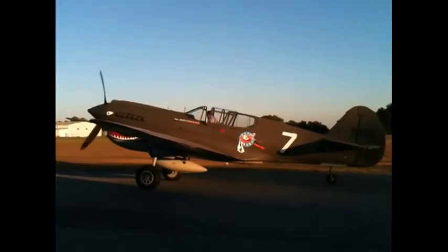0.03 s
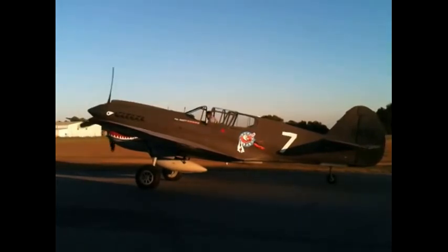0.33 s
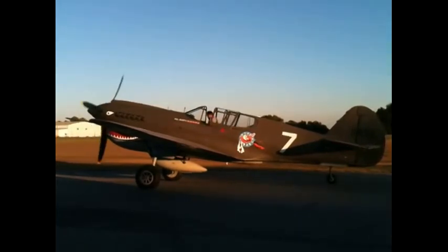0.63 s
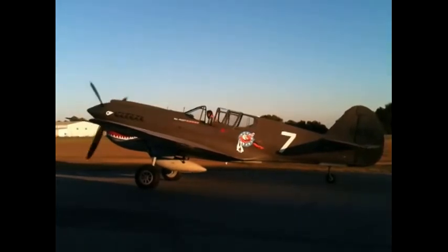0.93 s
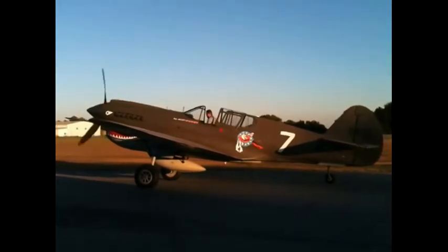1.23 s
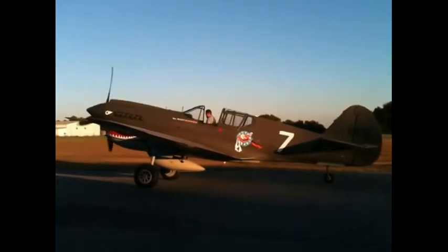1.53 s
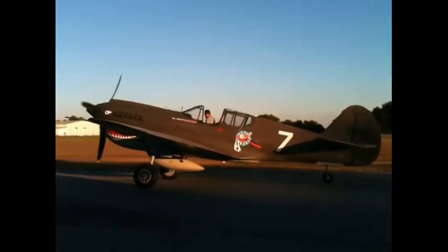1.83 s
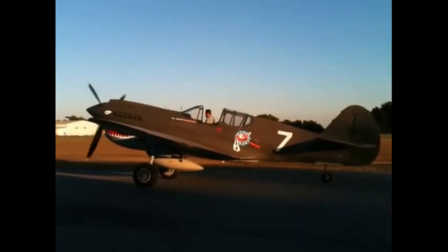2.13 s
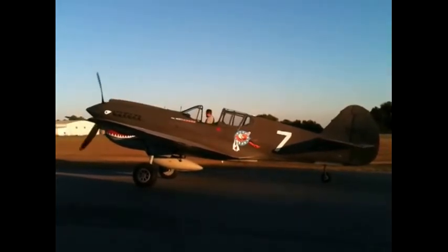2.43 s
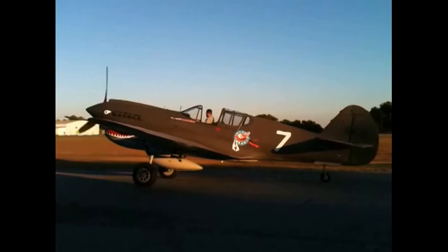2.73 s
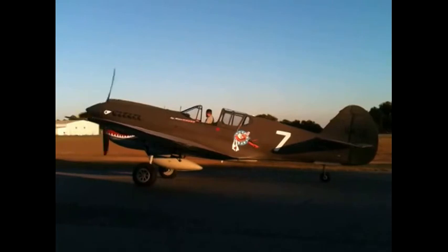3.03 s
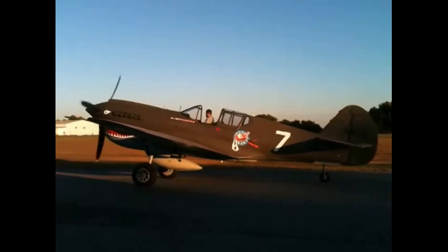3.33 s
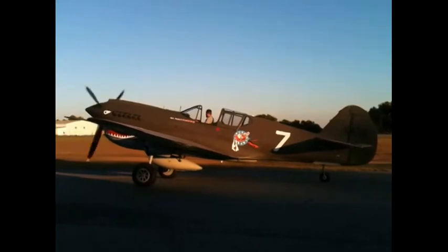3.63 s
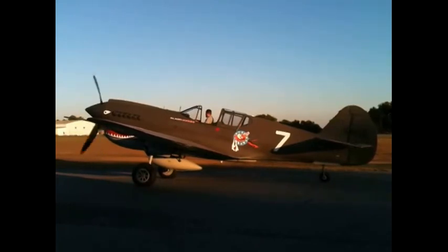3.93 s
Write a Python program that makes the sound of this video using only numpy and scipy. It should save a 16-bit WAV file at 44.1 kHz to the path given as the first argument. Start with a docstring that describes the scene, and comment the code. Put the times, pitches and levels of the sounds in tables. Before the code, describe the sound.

A piston aircraft engine idles steadily with rapid, spitting exhaust bursts over a low rumble.

```python
"""A twelve-cylinder piston aircraft engine idles near 830 rpm on an open apron, heard from the side.
From the start, each near-bank firing spits a sharp, whistling gas burst from its stub exhaust, with a
low thump; the far bank follows with a duller beat. Rumble and hiss fill the gaps, and the loudest
bursts overload the microphone. Weak firings come now and then. At 1.6 s a cylinder misfires and the
hiss dips briefly; it dips again near 2.5 s and 3.9 s."""
import sys
import numpy as np
from scipy import signal
from scipy.fft import rfft, irfft
from scipy.io import wavfile
from scipy.ndimage import uniform_filter1d

SR = 44100
rng = np.random.default_rng(int(sys.argv[2]) if len(sys.argv) > 2 else 0)


def wav_out(sig):
    """Save sig, one row per channel (or a flat mono array), as 16-bit PCM at SR to the path in sys.argv[1]."""
    wavfile.write(sys.argv[1], SR, np.round(np.clip(np.atleast_2d(sig).T, -1, 1) * 32767).astype(np.int16))


N = 176400


def undb(db):
    """Decibels to gain."""
    return 10 ** (np.asarray(db) / 20)


def level(x, rms_db):
    """Scale to an rms level."""
    return x * undb(rms_db) / np.sqrt(np.mean(x ** 2))


def curve(points, t):
    """Linear interpolation of (time, value) rows."""
    return np.interp(t, *np.array(points).T)


def walk(rate_hz):
    """Smooth random wander, rms 1."""
    hold = int(SR / rate_hz)
    steps = np.repeat(rng.standard_normal(N // 100), hold)[:N]
    return level(uniform_filter1d(uniform_filter1d(steps, hold), hold), 0)


def bins_hz():
    """FFT bin frequencies, floored at 1 Hz."""
    return np.maximum(np.fft.rfftfreq(N, 1 / SR), 1)


def colour(points):
    """Gain per bin from (Hz, dB) rows."""
    hz, db = np.array(points).T
    return undb(np.interp(np.log(bins_hz()), np.log(hz), db))


def noise(gain):
    """Coloured noise, rms 1."""
    return level(irfft(rfft(rng.standard_normal(N)) * gain, N), 0)


def even_noise(gain):
    """Coloured noise with a flattened envelope."""
    x = noise(gain)
    return x / np.sqrt(uniform_filter1d(x ** 2, size=350) + 1e-9)


def ring(x, gain):
    """Minimum-phase filter: a pulse rings on with the given colour."""
    cepstrum = irfft(np.log(gain), N)
    cepstrum[1:N // 2] *= 2
    cepstrum[N // 2 + 1:] = 0
    response = irfft(np.exp(rfft(cepstrum)), N)[:N // 20]
    return signal.fftconvolve(x, response)[:N]


def scatter(times, spread):
    """One Gaussian deviation per event."""
    return spread * rng.standard_normal(len(times))


def pulses(times, gains):
    """One click at each time."""
    inside = (times >= 0) & (times < (N - 1) / SR)
    return np.bincount((times[inside] * SR).astype(int), gains[inside], N)


def swells(times, gains, stretches, rise_s, fall_s):
    """One asymmetric Gaussian envelope per event."""
    out, reach = np.zeros(N), SR // 50
    for at, gain, stretch in zip(times, gains, stretches):
        i = np.arange(max(int(at * SR) - reach, 0), min(int(at * SR) + reach, N))
        dt = i / SR - at
        width_s = stretch * np.where(dt < 0, rise_s, fall_s)
        out[i] += gain * np.exp(-.5 * (dt / width_s) ** 2)
    return out


# Engine orders (order [cycles/turn], level [dB])
ENGINE_ORDERS = [(5.55, -49), (14.55, -41), (25.65, -46)]
def engine_tones(turns, waver_rad=.6, waver_db=2.5):
    """Faint wavering tones track the crankshaft and beat against the firings."""
    out = 0
    for order, db in ENGINE_ORDERS:
        tone = np.sin(2 * np.pi * order * turns + waver_rad * walk(6))
        out += level(tone * undb(waver_db * walk(6)), db)
    return out


# Rumble spectrum (frequency [Hz], relative density [dB])
RUMBLE_SPECTRUM = [(20, -32), (40, -29), (55, -14), (72, -8), (100, -5), (170, 0), (240, -1), (330, -5),
                   (430, -13), (550, -18), (900, -30)]
def rumble(turns, lope_db=2.2, lag_cycles=.72):
    """Propeller wash and engine rumble swell once per two-turn cycle."""
    lope = undb(lope_db * np.cos(2 * np.pi * (turns / 2 - lag_cycles)))
    return level(lope * noise(colour(RUMBLE_SPECTRUM)), rms_db=-29.5)


# Hiss spectrum (frequency [Hz], relative density [dB])
HISS_SPECTRUM = [(100, -25), (500, -10), (630, -4), (840, -.5), (1080, -9), (1450, -5.5), (2600, -9),
                 (3300, -8), (4500, -4), (6000, -1), (7200, 2), (9000, -2), (12000, -4), (15500, -5)]
# Hiss dips (time [s], length [s], body gain [dB], top gain [dB])
HISS_DIPS = [(1.622, .011, -7, -22), (2.469, .010, -13, -26), (3.873, .010, -10, -24)]
def hiss(t, split_hz=8500, body_flutter_db=1.0, top_flutter_db=1.5):
    """Fluttering hiss between the bursts; it dips briefly, most in the treble."""
    body_db, top_db = body_flutter_db * walk(50), top_flutter_db * walk(22)
    for at, length_s, body_dip_db, top_dip_db in HISS_DIPS:
        dip = np.exp(-(2 * (t - at) / length_s) ** 4)
        body_db += body_dip_db * dip
        top_db += top_dip_db * dip
    is_top = bins_hz() > split_hz
    body = noise(colour(HISS_SPECTRUM) * ~is_top) * undb(body_db)
    top = noise(colour(HISS_SPECTRUM) * is_top) * undb(top_db)
    return level(body, rms_db=-20.9) + level(top, rms_db=-22)


# Near bank in firing order
# (burst delay [s], gas gain [dB], bark gain [dB], thump gain [dB], thump delay [s])
CYLINDER_TRIMS = [(-.0003, 0, -.5, 1, .0003), (.0006, -.8, -1, 0, -.0003), (-.0004, -.3, 3, -1.5, .0003),
                  (.00015, .5, 0, -1.5, -.0002), (-.0003, -.5, -.5, 1.5, .0001),
                  (.0003, .3, 0, -.5, -.0003)]
# Weak firings and one misfire (time [s], gain [dB])
WEAK_FIRINGS = [(.339, -3.5), (.963, -3.5), (1.059, -3.5), (1.083, -3.5), (1.107, -2.5), (1.298, -2.5),
                (1.323, -2.5), (1.394, -4.5), (1.611, -18), (1.756, -3.5), (1.972, -3.5), (2.889, -2.5),
                (3.352, -4.5), (3.764, -3.5), (3.789, -3.5), (3.983, -4.5)]
def firings(turns, per_turn=3, first_s=.0055):
    """Six near-bank cylinders fire in two turns; returns times, cylinder trims and losses."""
    index = np.arange(int(turns[-1] * per_turn) + 1)
    times = first_s + np.interp(index / per_turn, turns, np.arange(N) / SR)
    loss_db = np.zeros(len(index))
    for at, db in WEAK_FIRINGS:
        loss_db[np.argmin(abs(times - at))] = db
    return times, np.array(CYLINDER_TRIMS)[index % len(CYLINDER_TRIMS)], loss_db


def bounce(x, delay_s=.0075, gain=.43):
    """Echoes between airframe and ground, as an all-pass filter."""
    delay = np.exp(-2j * np.pi * bins_hz() * delay_s)
    return irfft(rfft(x) * (gain + delay) / (1 + gain * delay), N)


# Thump spectrum (frequency [Hz], relative density [dB])
THUMP_SPECTRUM = [(30, -48), (55, -31), (83, -20), (104, -10), (124, -1.5), (166, -.7), (207, -1.3),
                  (249, -8), (290, -16), (400, -28), (700, -45)]
def thumps(times, trims, loss_db, lead_s=.0068, far_db=-21, fade_db_per_s=-.35):
    """Each firing's low pressure pulse; the far bank fires in between, screened by the fuselage."""
    thump_db, delay_s = trims[:, 3:].T
    at = times - lead_s + delay_s + scatter(times, .0002)
    near = pulses(at, undb(thump_db + .15 * loss_db + scatter(times, 1)))
    far = pulses(at + np.gradient(times) / 2, undb(far_db + scatter(times, 4)))
    beat = bounce(ring(near + far, colour(THUMP_SPECTRUM)))
    fade = undb(fade_db_per_s * np.arange(N) / SR)  # the aircraft creeps past
    return level(beat * fade, rms_db=-21.8)


# Exhaust stub modes (frequency [Hz], rms wander [Hz], level [dB], delay [s])
EXHAUST_MODES = [(660, 40, -41, .003), (850, 40, -39.5, .003), (1460, 100, -35.5, .0012),
                 (2150, 150, -36, .001), (2950, 150, -35.5, .001), (3700, 190, -31, .0008),
                 (4290, 240, -31, .0008), (4880, 250, -30.5, .0008), (5900, 220, -30, .0008),
                 (6450, 170, -23.3, .0008), (7030, 170, -20.7, .0008), (7720, 170, -21.5, .0006),
                 (10700, 600, -25, -.0005)]
def stub_whistle(times, burst_db, bark_db, stretches, bark_hz=(3200, 5500), scatter_db=3):
    """Each burst rings the stub's modes; those in the bark band differ most between cylinders."""
    out = 0
    for centre_hz, wander_hz, mode_db, delay_s in EXHAUST_MODES:
        trim_db = bark_db * (bark_hz[0] < centre_hz < bark_hz[1])
        gains = undb(burst_db + trim_db + scatter_db * np.minimum(scatter(times, 1), 1))
        envelope = swells(times + delay_s, gains, stretches, rise_s=.0025, fall_s=.0028)
        pitch_hz = centre_hz + wander_hz * walk(130)
        out += level(envelope * np.sin(2 * np.pi * np.cumsum(pitch_hz) / SR), mode_db)
    return out


# Gas spectrum, levelled per band below (frequency [Hz], relative density [dB])
GAS_SPECTRUM = [(260, -45), (450, -15), (538, -17), (614, -13), (838, -10), (1050, -18), (1430, -9),
                (1710, -16), (2130, -11), (2580, -16), (2950, -11), (3270, -14), (3630, -7), (5420, -9),
                (6280, -2), (7070, 0), (7840, -2), (8960, -8), (10900, -7), (15500, -12)]
def gas_jet(times, burst_db, bark_db, stretches, scatter_db=1.3):
    """Escaping gas darkens as it dies: four noise bands, bright first, dull last."""
    def band(low_hz, high_hz, delay_s, rise_s, fall_s, rms_db, trim_db=0):
        gains = undb(burst_db + trim_db + scatter(times, scatter_db))
        envelope = swells(times + delay_s, gains, stretches, rise_s, fall_s)
        in_band = (bins_hz() >= low_hz) & (bins_hz() < high_hz)
        return level(envelope * even_noise(colour(GAS_SPECTRUM) * in_band), rms_db)

    pop = band(520, 1150, delay_s=.003, rise_s=.004, fall_s=.0022, rms_db=-42)
    bark = band(1150, 5500, delay_s=.0003, rise_s=.0024, fall_s=.003, rms_db=-23.4, trim_db=bark_db)
    jet = band(5500, 8500, delay_s=.0003, rise_s=.0025, fall_s=.0027, rms_db=-18.4)
    spit = band(8500, SR / 2, delay_s=-.0014, rise_s=.0018, fall_s=.0033, rms_db=-16.2)
    return pop + bark + jet + spit


# Firing strength (time [s], gain [dB])
FIRING_STRENGTH = [(0.0, -1.2), (0.18, 0.9), (0.35, -0.4), (0.55, 0.2), (0.7, 0.4), (0.85, 0.7),
                   (1.05, 0.0), (1.16, 0.5), (1.35, -1.2), (1.57, 0.3), (1.8, 0.5), (2.0, 0.1), (2.3, 1.2),
                   (2.6, 0.6), (2.85, -0.1), (3.2, 0.7), (3.5, 0.7), (3.8, -0.8)]
def exhaust_bursts(times, trims, loss_db):
    """Each opening valve releases a gas jet and sets its stub ringing."""
    delay_s, gas_db, bark_db = trims[:, :3].T
    at = times + delay_s + scatter(times, .0002)
    burst_db = gas_db + loss_db + curve(FIRING_STRENGTH, times) + scatter(times, .5)
    stretches = np.exp(scatter(times, .13))
    return gas_jet(at, burst_db, bark_db, stretches) + stub_whistle(at, burst_db, bark_db, stretches)


# Crankshaft speed (time [s], speed [rpm])
CRANK_RPM = [(0.0, 840.1), (0.6, 833.1), (1.3, 834.4), (1.8, 829.7), (2.4, 828.7), (2.95, 827.3),
             (3.3, 818.8), (4.0, 828.8)]
def scene():
    """Mono mix; the crankshaft times all but the hiss."""
    t = np.arange(N) / SR
    turns = np.cumsum(curve(CRANK_RPM, t)) / 60 / SR
    fired = firings(turns)
    return (exhaust_bursts(*fired) + thumps(*fired) + hiss(t) + engine_tones(turns) + rumble(turns))[None]


def record(dry):
    """The microphone soft-clips the loudest peaks; deep bass and extreme treble are cut."""
    drive_db, ceiling, low_cut_hz, high_cut_hz = .4, .93, 46, 15800
    x = dry * undb(drive_db) / ceiling
    x = ceiling * x / (1 + x ** 8) ** (1 / 8)
    x = signal.sosfilt(signal.butter(3, low_cut_hz, "high", fs=SR, output="sos"), x)
    return signal.sosfilt(signal.ellip(10, .2, 70, high_cut_hz, fs=SR, output="sos"), x)


dry = scene()
out = record(dry)
wav_out(out)
```